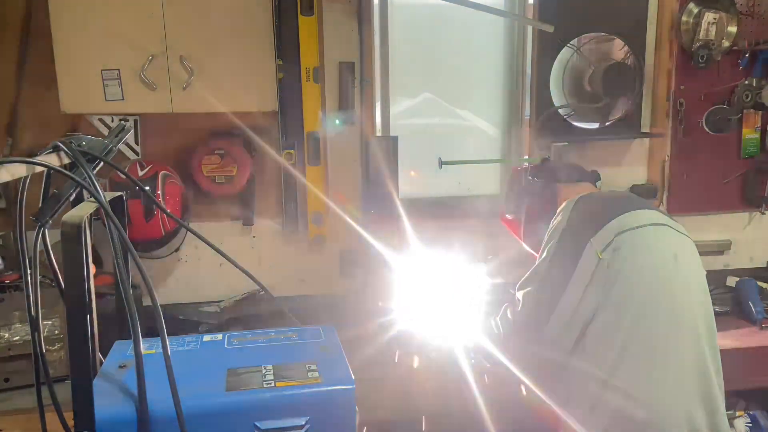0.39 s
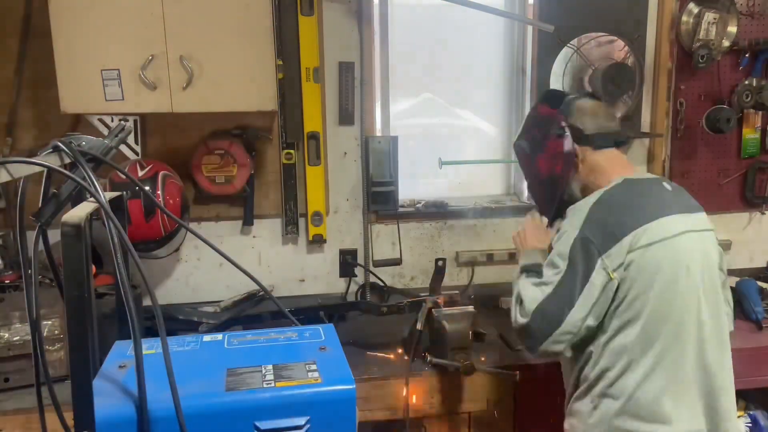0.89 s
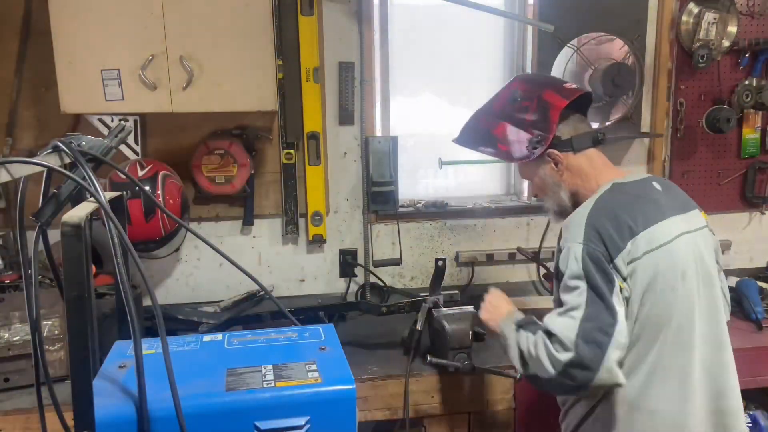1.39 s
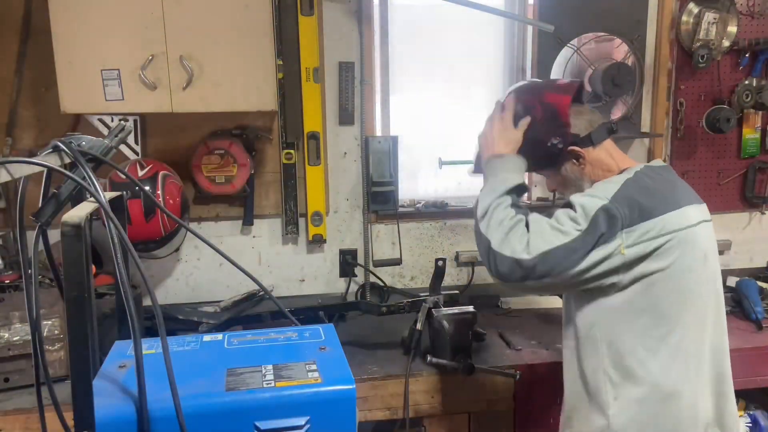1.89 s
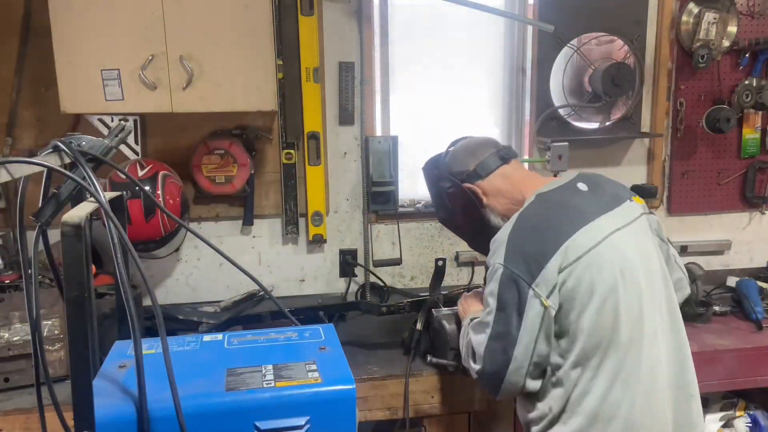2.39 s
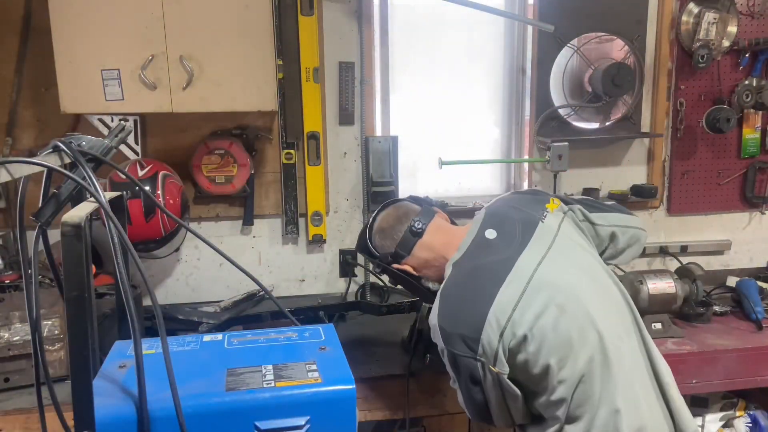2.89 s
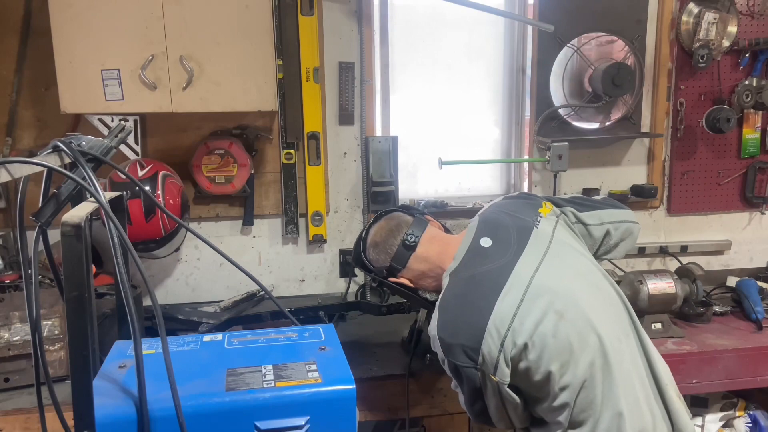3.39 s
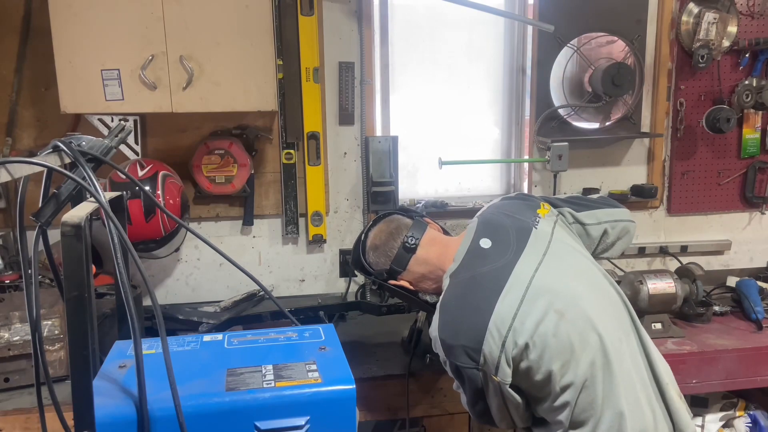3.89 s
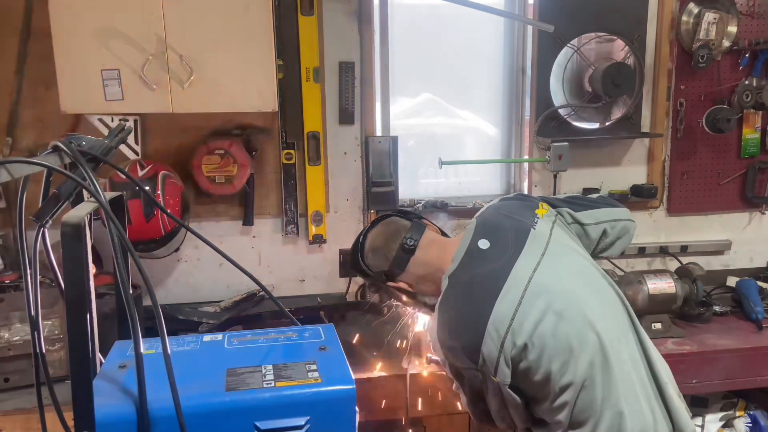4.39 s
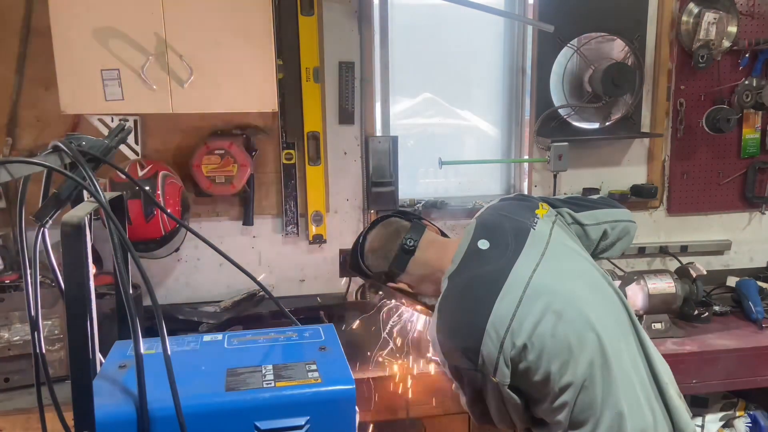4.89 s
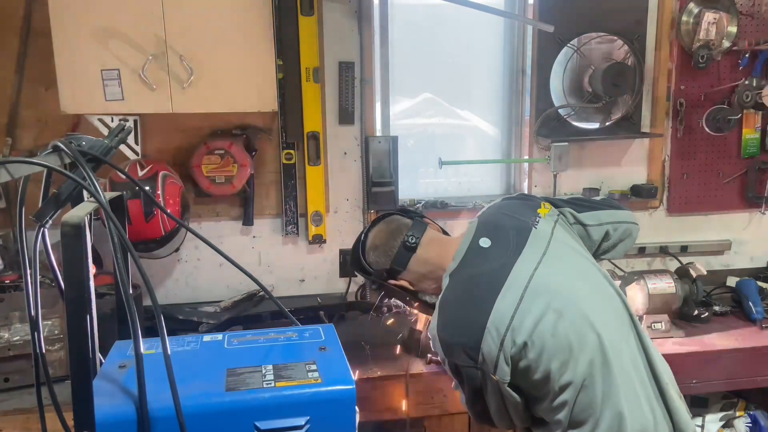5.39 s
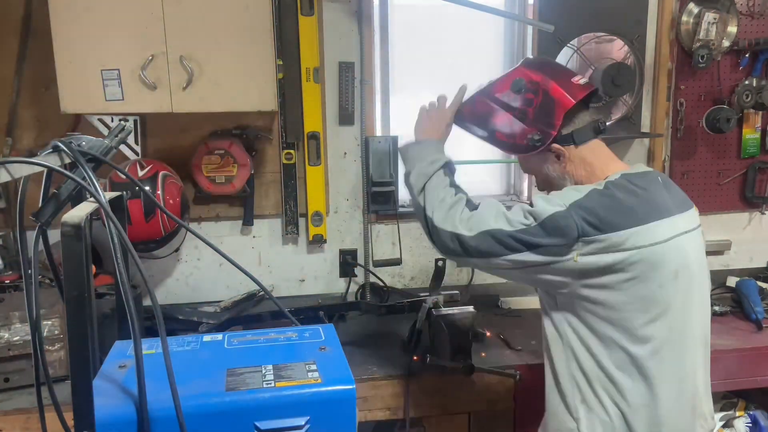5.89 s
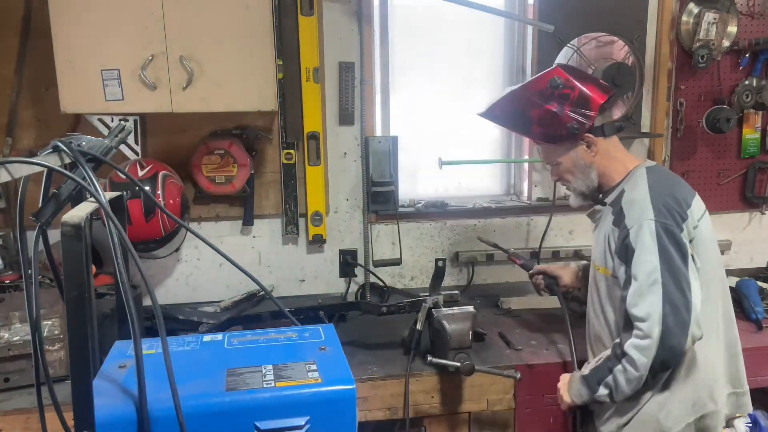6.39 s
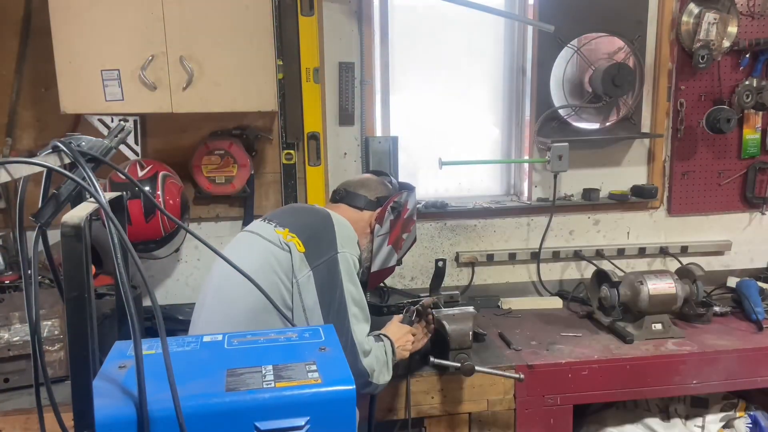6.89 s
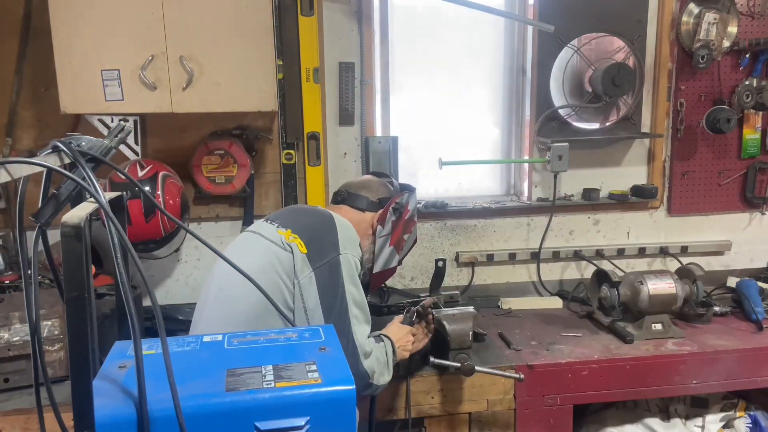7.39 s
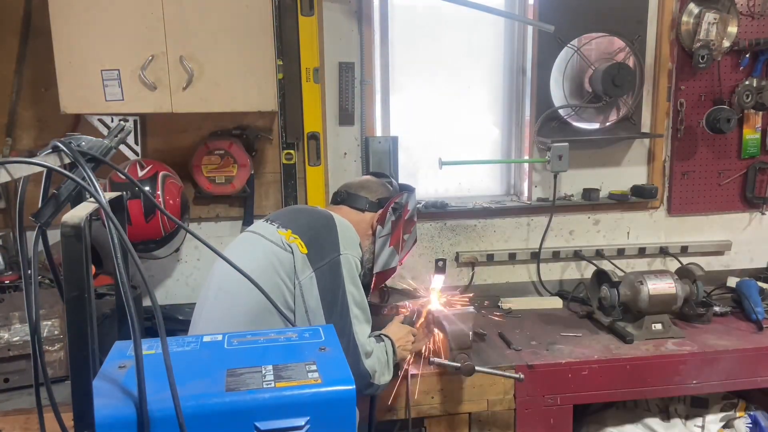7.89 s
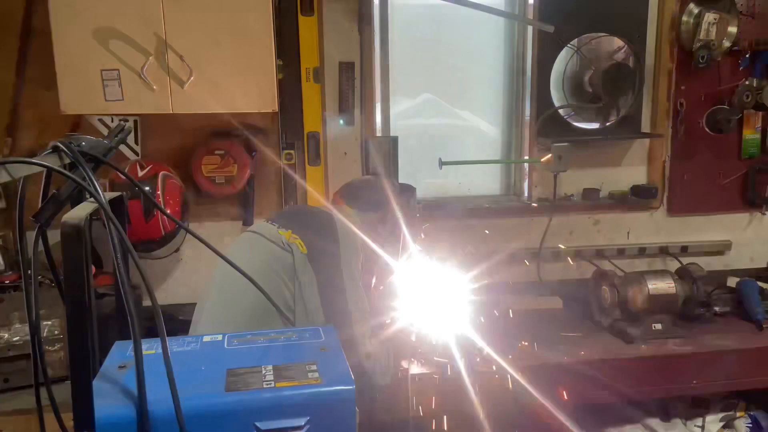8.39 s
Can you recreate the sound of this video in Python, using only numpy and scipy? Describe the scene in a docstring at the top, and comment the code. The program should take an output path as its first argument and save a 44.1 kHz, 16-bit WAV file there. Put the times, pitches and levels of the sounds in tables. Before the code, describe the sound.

A small garage heard from a few metres, with short, hard reflections. Throughout, a quiet transformer hum around 240 and 480 Hz and a soft airy fan with faint motor whine. From 0 to 0.7 s a weld sizzles faintly and steadily with small pops, ending on a slightly stronger snap. Until 4.1 s there is only hum, fan, small metal and plastic ticks near 1 and 1.3 s, and barely audible cloth rustle. At 4.1 s a much louder weld crackles in irregular sharp pops over fine sputter, thinning after 5 s, with a last heavier pop at 5.47 s. Light ticks and rustles follow to 6.1 s. At 6.56 s the sound dips for an instant and the fan and hum return a little stronger, with a brief hiss. At 7.97 s the third weld strikes with a dull metallic ring, then bright, dense, uneven snapping until 8.5 s.

```python
"""A small garage: wire-fed arc welding at a vice, three short welds heard from a few metres.
Short circuits are clicks over random sputter, answered by filter resonances and decaying echoes.
The welder's transformer is a hum of wavering sines; its fan is coloured noise with narrow lines.
Sleeves and helmet rustle and tick as shaped noise bursts; the level dips briefly once."""
import sys
import numpy as np
from scipy import signal
from scipy.fft import rfft, irfft
from scipy.io import wavfile
from scipy.ndimage import uniform_filter1d

SR = 44100
rng = np.random.default_rng(int(sys.argv[2]) if len(sys.argv) > 2 else 0)


def to_wav(s):
    """Save 16-bit WAV."""
    ch = np.atleast_2d(s).T  # columns
    pcm = np.round(np.clip(ch, -1, 1) * 32767)  # PCM
    wavfile.write(sys.argv[1], SR, pcm.astype(np.int16))


def boost(x):
    """Linear amplitude factor 10**(x/20) for a level x in decibels (scalar or array-like)."""
    u = np.asarray(x, float) / 20
    return 10 ** u


N = 374850
T = np.arange(N) / SR
MAINS_HZ = 60


def curve(table):
    """Interpolates the columns of a (time_s, value, ..) table at every sample."""
    time_s, *columns = np.transpose(table)
    return [np.interp(T, time_s, column) for column in columns]


def unit(x):
    """Scales to rms 1."""
    return x / np.sqrt(np.mean(x ** 2) + 1e-30)


def band(x, lo_hz, hi_hz, order=2):
    """Butterworth band-pass, its edges held inside the audible range."""
    limits_hz = np.clip([lo_hz, hi_hz], [20, 30], [.44 * SR, .45 * SR])
    return signal.sosfilt(signal.butter(order, limits_hz, "band", fs=SR, output="sos"), x)


def colour(x, points, peaks=(), lift_db=0, size=4096):
    """Minimum-phase filter from (Hz, dB) points; each resonance rises by the lift plus a share of its dB."""
    hz = np.maximum(np.fft.rfftfreq(size, 1 / SR), 1)
    points_hz, points_db = np.array(points)[:, 0], np.array(points)[:, 1]
    db = np.interp(np.log(hz), np.log(points_hz), points_db)
    for pitch_hz, width_hz, peak_db in peaks:
        rise_db = max(lift_db + 0.44 * peak_db, 0)
        db = db + rise_db / (1 + ((hz - pitch_hz) / width_hz) ** 2)
    # folding the cepstrum makes the response causal
    cepstrum = irfft(np.log(boost(db)))
    cepstrum[1:size // 2] *= 2
    cepstrum[size // 2 + 1:] = 0
    impulse = irfft(np.exp(rfft(cepstrum)))
    return signal.fftconvolve(x, impulse)[:len(x)]


def walk(rate):
    """Random levels held 1 / rate s and slewed twice; spread near 1."""
    hold = int(SR / rate)
    steps = np.repeat(rng.standard_normal(N // hold + 1), hold)
    return 1.3 * uniform_filter1d(uniform_filter1d(steps, hold), hold)[:N]


def sputter_grains(sputter_db, start_s, end_s):
    """Fine sputter: random grains over a plasma hiss, both swung by the rectified mains current."""
    grains_per_s, spread_db, hiss_db = 500, 6, -6.5
    depth = .8  # 0-1
    ripple = (1 + depth * np.cos(2 * np.pi * 4 * MAINS_HZ * T)) ** 2 / (1 + depth ** 2 / 2)
    struck = rng.random(N) < ripple * grains_per_s / SR
    grains = unit(struck * boost(spread_db * np.minimum(rng.exponential(size=N), 3)))
    grains += boost(hiss_db) * ripple * rng.standard_normal(N)
    return grains * boost(sputter_db + 0.8 * walk(30)) * (T > start_s) * (T < end_s)


def weld(sputter, arc, ring, space):
    """Short circuits snap the air; many small ones fill the gaps; metal and walls answer each."""
    # loud pops, levels before band offsets: start_s, lows_db, treble_db
    pops = [(.0083, -39, -47), (0.0182, -40, -34), (0.034, -41, -41), (0.129, -41, -30), (0.142, -54, -28),
            (0.1625, -43, -40), (.2035, -54, -39), (.257, -46, -37), (0.2756, -38.5, -40), (.424, -41, -34),
            (0.5218, -41.5, -36.5), (.629, -56, -38), (.692, -36, -26.5), (4.1068, -19, -9),
            (4.125, -24.5, -17.5), (4.1653, -19, -6.5), (4.1906, -23.5, -44.5), (4.224, -19.5, -16),
            (4.262, -26, -47), (4.3038, -32, -24), (4.341, -21.5, -11), (4.3622, -14.5, -14.5),
            (4.3703, -16, -11), (4.3992, -27.5, -26), (4.487, -23.5, -12), (4.496, -25, -13),
            (4.504, -21.5, -12), (4.5244, -19.5, -15), (4.5405, -22.5, -25), (4.5535, -23, -28),
            (4.5618, -23, -17), (4.6059, -23, -12), (4.675, -26, -13), (4.687, -22.5, -17),
            (4.7072, -20, -17), (4.754, -21, -16), (4.7612, -20.5, -16.5), (4.808, -28, -15.5),
            (4.8203, -22, -17), (4.828, -23, -17), (4.8329, -21, -16.5), (4.878, -26.5, -16.5),
            (4.932, -45, -20), (4.942, -27.5, -15), (4.9582, -56, -20), (5.01, -68, -20.5),
            (5.0237, -32.5, -13), (5.0536, -33, -15.5), (5.061, -34, -18.5), (5.1545, -51, -19.5),
            (5.212, -26.5, -21), (5.3487, -42, -34), (5.395, -45, -30.5), (5.4243, -36.5, -37),
            (5.4529, -32, -30), (5.4695, -14, -22), (7.974, -38, -20), (7.9777, -19, -16),
            (8.015, -9.5, -9.5), (8.0397, -26, -25), (8.045, -28, -19), (8.0526, -19.5, -12),
            (8.0616, -23, -11), (8.0695, -16, -11), (8.0773, -18, -15), (8.0863, -25, -16),
            (8.0908, -14.5, -13), (8.107, -20, -14.5), (8.1112, -29, -18), (8.1162, -33, -21),
            (8.1597, -56, -32), (8.176, -59, -37), (8.2162, -16.5, -9), (8.2323, -21.5, -13.5),
            (8.2467, -22.5, -21), (8.257, -24, -19), (8.2779, -23, -9.5), (8.286, -14.5, -12),
            (8.295, -18, -17), (8.3073, -15.5, -14.5), (8.3158, -17, -17), (8.3198, -24, -24),
            (8.336, -24.5, -17), (8.3452, -21, -14), (8.3706, -36, -21), (8.382, -24.5, -11.5),
            (8.3944, -25, -30), (8.4149, -32, -38), (8.4365, -39, -17), (8.486, -41, -20)]
    # bass of the arc under its lows: time_s, level_db
    bass = [(0, -5.5), (.7, -1.5), (4.1, -4.5), (4.25, -12), (4.37, -13), (4.5, -11.5), (4.6, -6),
            (4.76, -13.5), (4.83, -6.5), (4.9, -18), (5.05, -10.5), (5.21, -14), (5.4, -1), (5.47, -12.5),
            (7.97, -7), (8.1, -8.5), (8.22, -7.5), (8.29, -18.5), (8.33, -11), (8.4, -3.5), (8.43, 2.5),
            (8.5, -15)]
    # limits of bass, lows, middle and treble: edge_hz
    edges_hz = (200, 1180, 3300, 7800, 17000)
    bench_db, bench_t60_s, wall_db, sputter_low_db, lift_db, small_db, snap_db = space
    start_s, end_s = sputter[0][0], sputter[-1][0]
    sputter_db = curve(sputter)[0]

    # small pops fall at random
    small_per_s, scatter_db, small_lows_db = 50, 4.5, -12.5
    count = int(small_per_s * (end_s - start_s))
    when_s = rng.uniform(start_s, end_s, count)
    low, high = rng.standard_normal((count, 2)).T
    peak_db = sputter_db[(when_s * SR).astype(int)] + small_db
    small = np.transpose([when_s, peak_db + small_lows_db + scatter_db * low, peak_db + scatter_db * high])
    loud = [row for row in pops if start_s <= row[0] < end_s]
    pop_s, low_db, treble_db = np.transpose(loud + list(small))
    at = (pop_s * SR).astype(int)

    grains = sputter_grains(sputter_db, start_s, end_s)
    probe = colour(np.eye(1, 2048, 99)[0], arc, ring, lift_db)  # one click, to scale each band's peak
    # small sparks are thin and bright, so the middle lies between lows and treble
    middle_db = 0.32 * low_db + 0.63 * treble_db - 4.0
    bass_db = curve(bass)[0]
    pop_db = (low_db + bass_db[at], low_db - 3.0, middle_db, treble_db)
    fine_db = (sputter_low_db + bass_db, sputter_low_db - 2, 0.36 * sputter_low_db + 0.5, 0)
    holds = (1.83, 1.34, 0.91, 0.67)  # walls keep the lows longer than the treble
    wall_base_t60_s, gate_s = 0.2, 0.031
    back_wall_s, back_wall_db = 0.003803, -12.5  # one strong reflection, bass and lows only
    out = 0
    for db, fine, lo_hz, hi_hz, hold in zip(pop_db, fine_db, edges_hz, edges_hz[1:], holds):
        direct_db = snap_db if lo_hz > edges_hz[1] else 0
        clicks = boost(fine) * grains
        clicks[at] += boost(db)
        back_wall = boost(back_wall_db) * np.roll(clicks, int(back_wall_s * SR))
        answer = (hi_hz <= edges_hz[2]) * back_wall
        quick = bench(clicks, bench_db, bench_t60_s * hold)
        answer += quick + echoes(clicks, wall_db, wall_base_t60_s * hold, gate_s)
        # forwards and backwards, so that the bands add up to one sharp snap
        split = signal.butter(2, [lo_hz, hi_hz], "band", fs=SR, output="sos")
        probe_peak = np.abs(signal.sosfiltfilt(split, probe)).max()
        out = out + signal.sosfiltfilt(split, boost(direct_db) * clicks + answer) / probe_peak
    return colour(out, arc, ring, lift_db)


def bench(clicks, db, t60_s, gap_s=0.00082):
    """Quick reflections off vice, bench top and torch; their pattern drifts between two as the arc wanders."""
    t, turn = T[:4096], 1.2 * walk(14)
    patterns = rng.standard_normal((2, len(t))) * 1000. ** (-t / t60_s) * (t > gap_s)
    shares = np.cos(turn), np.sin(turn)
    return boost(db) * sum(signal.fftconvolve(clicks * share, p)[:N] for share, p in zip(shares, patterns))


def echoes(clicks, db, t60_s, gate_s, gap_s=0.00034):
    """Dense decaying wall echoes as noise, each tail cut off after gate_s as by a noise gate."""
    keep, end = 10 ** (-6 / (t60_s * SR)), int(gate_s * SR)
    power = signal.lfilter([1], [1, -keep], np.roll(clicks ** 2, int(gap_s * SR)))
    power -= keep ** end * uniform_filter1d(np.roll(power, end), end // 3)
    return boost(db) * np.sqrt(np.maximum(power, 0)) * rng.standard_normal(N)


def shifting(x, depth_db, rate, count=30):
    """The arc wanders along the joint, so each band of its colour rises and sinks on its own."""
    # overlapping bands, evenly spaced in log frequency from 400 Hz to 16 kHz
    hz = np.maximum(np.fft.rfftfreq(N, 1 / SR), 1)
    place = np.clip(np.log(hz / 400) / np.log(40) * (count - 1), 0, count - 1)
    spectrum = rfft(x)
    return sum(boost(depth_db * walk(rate)) * irfft(spectrum * np.maximum(1 - np.abs(place - k), 0), N)
               for k in range(count))


def handling():
    """Ticks and ringing metal start at once and die; rustles swell and fade, grainy."""
    # helmet, gloves, torch, metal as an arc strikes or dies: start_s, peak_db, pitch_hz, width_hz, t60_s
    ticks = [(.13, -46.5, 5490, 280, 0.16), (0.131, -44.5, 2800, 280, 0.11), (5.025, -38, 1770, 120, 0.14),
             (0.961, -50, 3030, 4400, 0.02), (.961, -45.5, 760, 200, 0.12), (.962, -49.5, 2050, 400, .03),
             (.978, -47, 1750, 900, 0.017), (1.59, -57, 1570, 50, 0.087), (2.11, -53.5, 1010, 70, 0.34),
             (0.976, -44, 1045, 60, 0.046), (1.101, -62, 12000, 4000, 0.015),
             (1.206, -61, 8500, 4000, .015), (1.261, -49, 8250, 2000, 0.094),
             (1.276, -43.5, 9200, 4500, 0.041), (1.2965, -46, 8900, 3980, 0.022),
             (1.334, -63, 8400, 5000, 0.03), (2.0305, -57, 10700, 7000, .015),
             (2.178, -59, 11100, 6000, 0.024), (2.218, -59, 7200, 4000, 0.014),
             (2.484, -51, 10500, 6000, 0.02), (2.63, -62, 8000, 7000, 0.044),
             (2.833, -52.5, 9000, 5000, 0.033), (3.021, -60, 8000, 6000, 0.02),
             (5.563, -50, 7000, 3000, .012), (5.581, -51, 7200, 3500, .012), (5.61, -53, 8000, 8000, 0.021),
             (5.789, -52.5, 353, 120, 0.034), (5.9897, -54, 4600, 1200, 0.018),
             (6.045, -44.5, 8300, 2600, 0.026), (7.978, -25, 542, 128, 0.23),
             (0.695, -42.5, 1690, 60, 0.058)]
    # cloth and short hisses, level before graining and fades: middle_s, length_s, level_db, pitch_hz, width_hz
    rustles = [(0.143, 0.021, -54, 12300, 2000), (1.62, 1, -80.5, 4460, 2500),
               (1.19, 0.27, -79, 8100, 7060), (1.775, 0.079, -74, 13000, 1300),
               (1.865, 0.038, -77, 7900, 1944), (1.962, 0.023, -76, 8981, 7100),
               (2.09, 0.5, -84, 9167, 6631), (2.47, 0.074, -75, 9074, 6480),
               (2.838, 0.048, -72.5, 9800, 1728), (2.845, 0.12, -79, 12800, 1200),
               (5.866, 0.045, -66, 5030, 500), (5.866, 0.048, -69, 5900, 500),
               (5.95, 0.24, -74.5, 9600, 8000), (4.8, 0.054, -67, 8200, 3780),
               (6.593, 0.047, -61.5, 9980, 1800), (6.593, 0.042, -61.5, 12700, 1900)]
    out = np.zeros(N)
    for start_s, db, pitch_hz, width_hz, t60_s in ticks:
        i, t = int(start_s * SR), T[:8000]
        burst = rng.standard_normal(len(t)) * 1000. ** (-t / t60_s)
        order = 2 if width_hz < 300 else 3  # narrow ones speak sooner
        tick = band(burst, pitch_hz - width_hz / 2, pitch_hz + width_hz / 2, order=order)
        out[i:i + len(t)] += boost(db) * tick / np.abs(tick).max()
    grain = boost(3 * walk(500) + 1.3 * walk(60))
    snags = (rng.random(N) < 70 / SR) * rng.exponential(size=N)  # fibres catch and let go
    grain *= 1 + 1.6 * signal.lfilter([1], [1, -np.exp(-1 / (.0015 * SR))], snags)
    for middle_s, length_s, db, pitch_hz, width_hz in rustles:
        part = slice(int((middle_s - 1.5 * length_s) * SR), int((middle_s + 1.5 * length_s) * SR))
        hiss = rng.standard_normal(N)[part]
        noise = unit(band(hiss, pitch_hz - width_hz / 2, pitch_hz + width_hz / 2, order=3))
        envelope = np.exp(-((T[part] - middle_s) / (0.6 * length_s)) ** 2)
        out[part] += boost(db) * noise * grain[part] * envelope
    return out


def transformer():
    """Iron buzzes at 4, 8 and 12 times the mains, each line wavering in level."""
    # lowest line, stepping up at 6.56 s: time_s, 240_hz_db
    fundamental = [(0, -61), (6.56, -63), (6.57, -60.5), (8.5, -59.5)]
    # overtones, changing with the arc's load and stepping at 6.56 s: time_s, 480_hz_db, 720_hz_db
    overtones = [(0, -66, -95), (.8, -63.5, -72.5), (1.6, -64.5, -74.5), (2.4, -60.5, -68),
                 (4.1, -57.5, -72), (4.2, -64, -79), (4.89, -62, -79), (4.94, -49, -77), (5.05, -64.5, -74),
                 (5.5, -58.5, -67.5), (6.55, -69.5, -81), (6.57, -57, -80.5), (8.5, -62, -77)]
    hum_db = curve(fundamental) + curve(overtones)
    wobble_db = (.08, 1.2, 1.8)
    hum = 0
    for k, db, wobble in zip(range(4, 13, 4), hum_db, wobble_db):
        level = np.sqrt(2) * boost(db + wobble * walk(12))
        hum = hum + level * np.sin(2 * np.pi * k * MAINS_HZ * T + rng.uniform(0, 2 * np.pi))
    return hum


def fan():
    """Blade turbulence is coloured noise; shaft and motor sing as sines and narrow noise."""
    # wavering motor lines, before the fan level: pitch_hz, level_db, width_hz
    motor_lines = [(303.7, -80, 6.9), (447, -74, 3), (531, -75.5, 4.4), (557.4, -76.5, 4.3), (779, -77, 3),
                   (830, -77, 3), (890, -83.5, 2.7), (912, -75.5, 4.2), (1180, -80, 3), (1677, -77, 12.55),
                   (1948, -77.5, 2.6), (2226, -76.5, 6.7), (2240, -81.5, 7.8), (2420, -76, 8.7),
                   (7060, -91.5, 250)]
    # shaft tones, before the fan level: pitch_hz, level_db
    shaft = [(115.05, -89), (296.3, -76)]
    # faint fluttering tone: pitch_hz, width_hz, beats_per_s
    chirp_hz, chirp_width_hz, chirp_rate = (3170, 45, 24)
    # its level before flutter and fan level: time_s, level_db
    chirp_level = [(2.4, -82), (2.75, -80), (4.2, -81), (5.5, -80), (6.6, -83)]
    # colour of the air noise: pitch_hz, relative_db
    air_colour = [(18, -60), (30, -40), (59, -43.5), (100, -47), (181, -33.5), (206, -17.5), (235, -15),
                  (383, -16), (482, -7.5), (656, -15.5), (728, -10.5), (1270, -17), (1400, -13),
                  (1700, -14.5), (2080, -17.5), (2750, -19.5), (3000, -25.5), (3250, -25.5), (3770, -31.5),
                  (14000, -54.5)]
    # fan level, drifts slowly, then steps up at 6.56 s: time_s, gain_db
    fan_level = [(0, 0), (2.4, 0.5), (4.1, -1.5), (5.5, 1), (6.55, 0), (6.57, 2.5), (8.5, 1.5)]
    air_db = -64.5  # 1046-2730 Hz rms, before flutter and fan level

    lines = sum(boost(db) * unit(band(rng.standard_normal(N), f - w / 2, f + w / 2, order=1))
                for f, db, w in motor_lines)
    lines = lines + sum(np.sqrt(2) * boost(db) * np.sin(2 * np.pi * f * T) for f, db in shaft)
    flutter = (1 + np.sin(2 * np.pi * chirp_rate * T + 2 * walk(8))) ** 2 / 2
    chirp = band(rng.standard_normal(N), chirp_hz - chirp_width_hz / 2, chirp_hz + chirp_width_hz / 2)
    lines = lines + boost(curve(chirp_level)[0]) * flutter * unit(chirp)
    air = colour(rng.standard_normal(N), air_colour)
    air = air / np.std(band(air, 1046, 2730)) * boost(0.39 * walk(15))  # turbulence flutters
    return boost(curve(fan_level)[0]) * (lines + boost(air_db) * air)


def scene():
    """Three welds, the first the steadiest, over the idling machine and the handling."""
    # fine sputter between pops, one curve a weld: time_s, level_db
    sputter = [
        [(0, -71.5), (.35, -69), (.69, -70.5), (.8, -92)],
        [(4.07, -65.5), (4.25, -56), (4.4, -57.5), (4.83, -52.5), (4.96, -57.5), (4.99, -63), (5.035, -52.5),
         (5.1, -63), (5.15, -59.5), (5.23, -65.5), (5.26, -71), (5.45, -66.5), (5.6, -104)],
        [(7.97, -71), (8.1, -57), (8.15, -63), (8.21, -59.5), (8.42, -55), (8.5, -57.5)],
    ]
    # colour of each weld as it reaches the microphone: pitch_hz, level_db
    arc = [
        [(350, -17), (600, 4.5), (1170, -0.5), (2270, 14), (3390, -10.5), (5550, -16.5), (7750, -18.5),
         (12500, -10), (14500, -17)],
        [(70, -63.5), (260, -32.5), (460, -18), (793, -9.5), (1050, -12), (1350, -5.5), (1480, -14.5),
         (1710, 1), (1900, -4), (2570, -1), (3050, 1), (3300, -14), (3600, -3.5), (4040, -8), (7990, -8.5),
         (9500, -7), (13000, -8), (14500, -14)],
        [(70, -58), (260, -38), (450, -20.5), (800, -2), (944, 2), (1140, -14.5), (1330, -2), (1590, -3.5),
         (1780, -6.5), (2460, 4), (3300, -9.5), (3700, -9), (7500, -11.5), (9000, -5), (12600, -12),
         (14300, -29)],
    ]
    # resonances of vice, bench and work in each position: pitch_hz, half_width_hz, peak_db (before share and lift)
    ring = [
        [(1430, 160, 13), (12300, 600, -1)],
        [(832, 20.7, 2), (1023, 38.7, 4), (1690, 170, 2.5), (2200, 32, 12.5), (2500, 66, 10.5),
         (4010, 100, 2.5), (5510, 140, -4), (11370, 88, -2), (12400, 45, -6.5), (12880, 70, -3)],
        [(534, 16, -8), (1310, 26, -4), (1533, 87, 8.5), (1880, 57, 0), (2080, 71, -6), (2500, 130, -10),
         (3210, 23, 5), (3680, 50, 12), (4640, 130, -3), (5750, 170, -2)],
    ]
    # shading by where the welder stands: bench_db, bench_t60_s (before band factor), wall_db, sputter_lows_db,
    # ring_lift_db, small_pops_over_sputter_db, snap_db (treble left unhidden by torch and hands)
    space = [(-26.5, 0.041, -34.5, -5, 1, 22.5, -4), (-26, 0.061, -32, -12.5, 7, 20, -4.5),
             (-25.5, 0.03, -34.5, -11.5, 5.5, 19, -1.5)]
    arcs = sum(weld(*parts) for parts in zip(sputter, arc, ring, space))
    depth_db = np.where(T < sputter[1][0][0], .8, 2.2)
    return (shifting(arcs, depth_db=depth_db, rate=22) + handling() + transformer() + fan())[None]


def roll_off(x):
    """The treble ends steeply here."""
    return signal.sosfilt(signal.butter(12, 15540, fs=SR, output="sos"), x)


def record(dry):
    """The microphone rounds the sharpest snaps; the level dips briefly; the top is cut steeply."""
    ceiling, top_hz = .7, 14300
    dip_s, fade_out_s, fade_in_s = 6.562, 0.025, 0.038
    fade = np.clip(np.maximum((dip_s - T) / fade_out_s, (T - dip_s) / fade_in_s), .03, 1)
    rounded = ceiling * np.tanh(dry / ceiling)
    low_pass = signal.ellip(5, .5, 28, top_hz, fs=SR, output="sos")
    mix = signal.sosfilt(low_pass, rounded * fade)
    return roll_off(mix)


dry = scene()
out = record(dry)
to_wav(out)
```